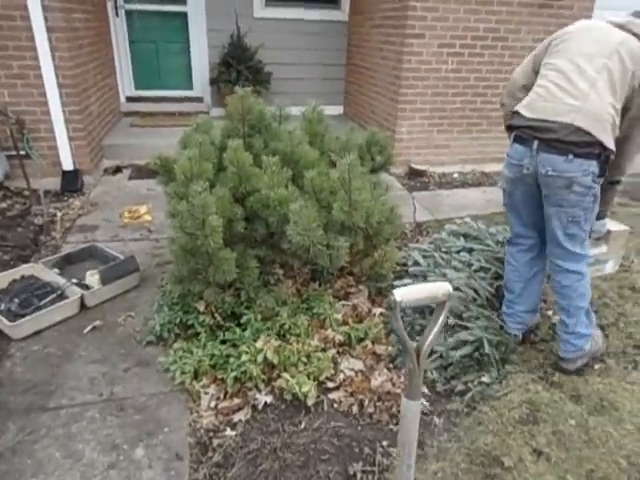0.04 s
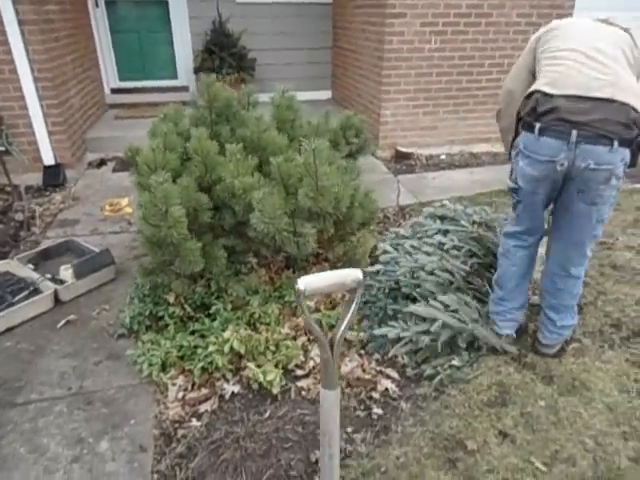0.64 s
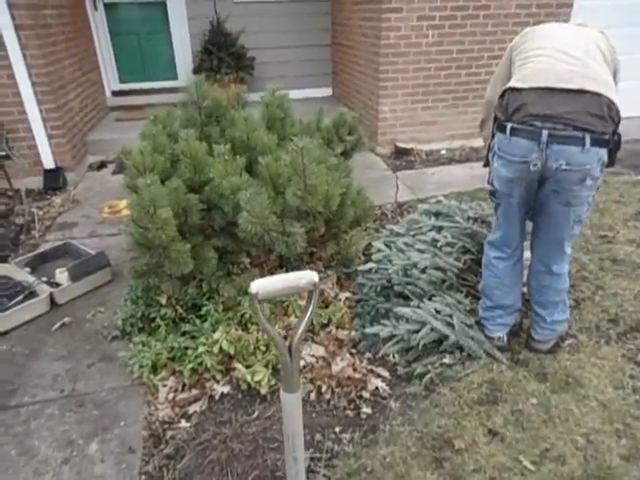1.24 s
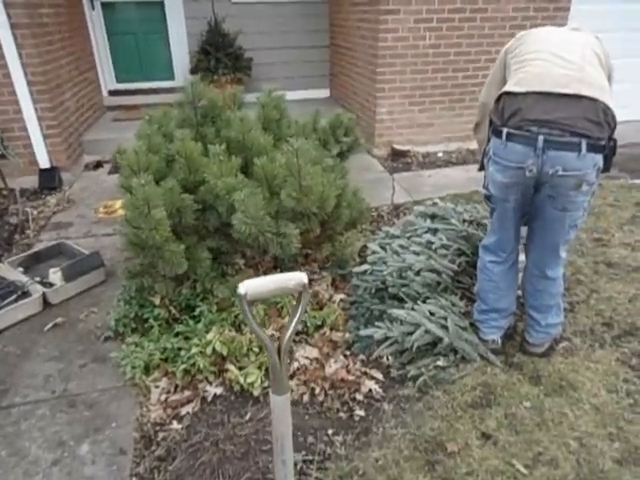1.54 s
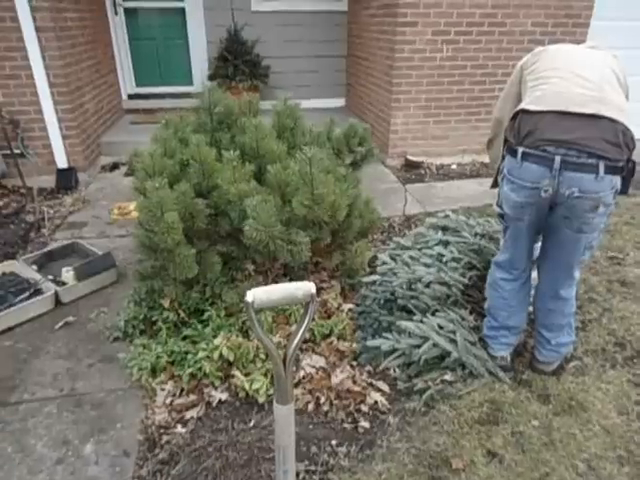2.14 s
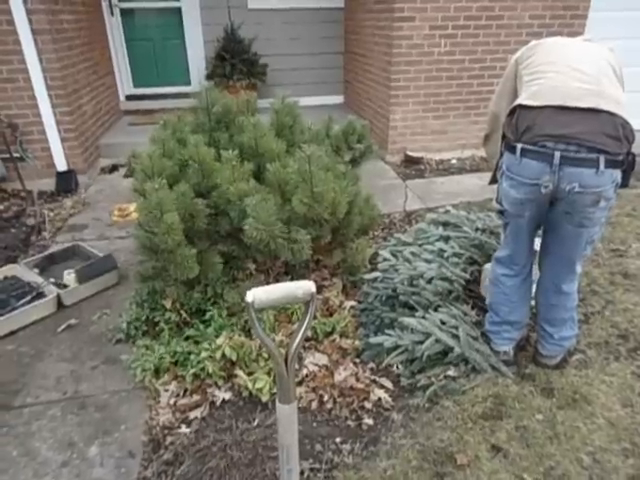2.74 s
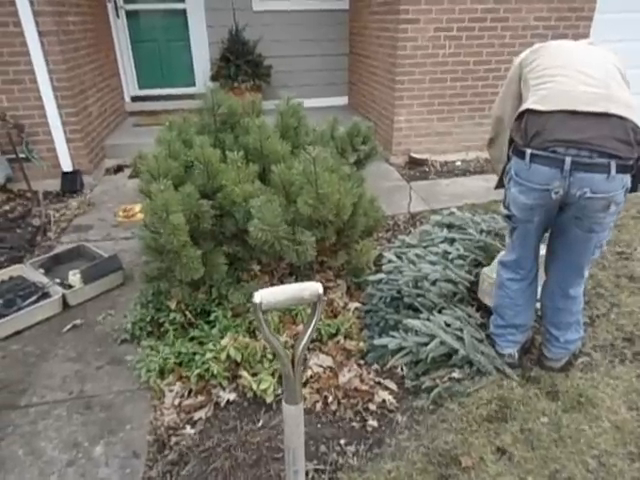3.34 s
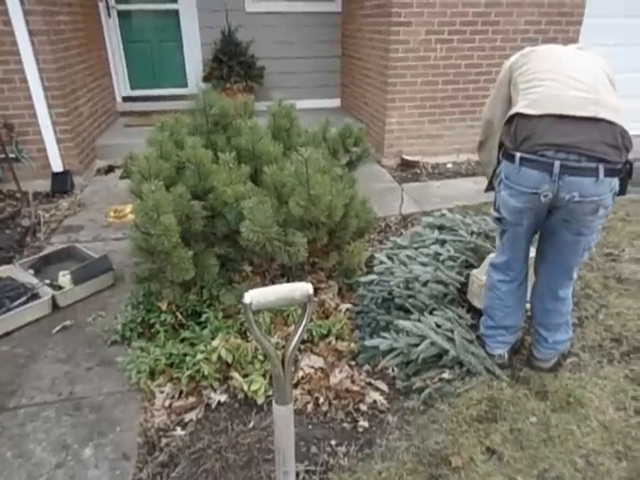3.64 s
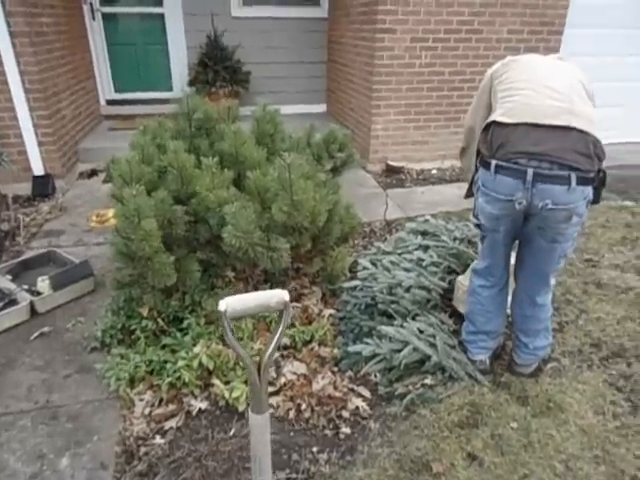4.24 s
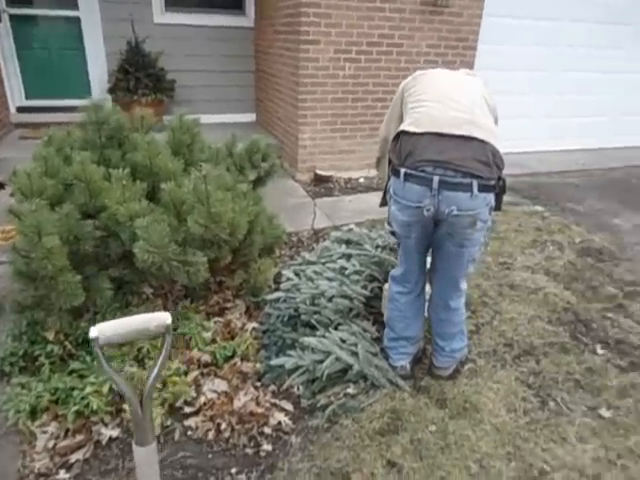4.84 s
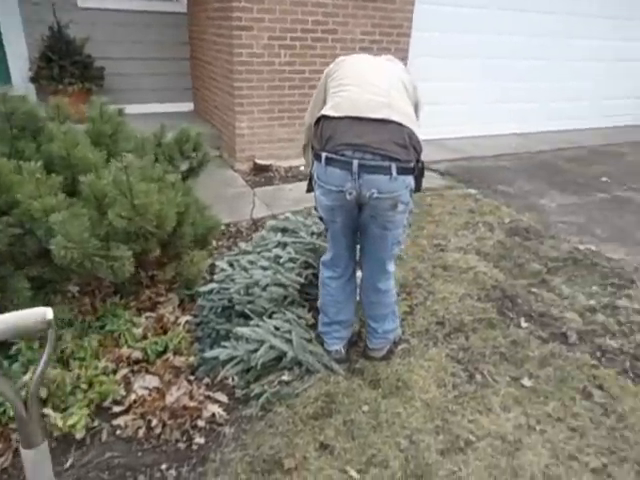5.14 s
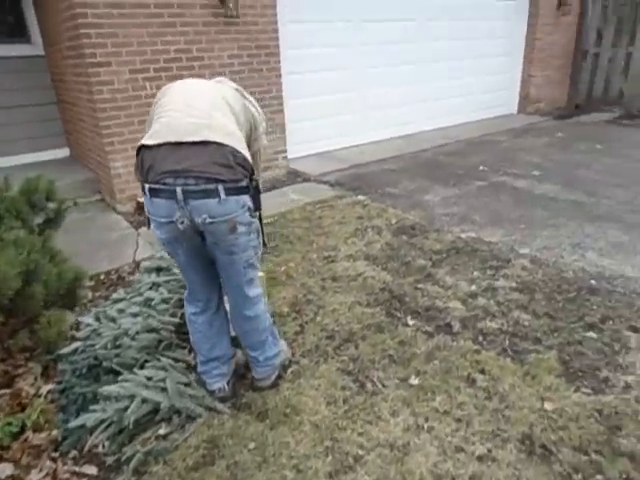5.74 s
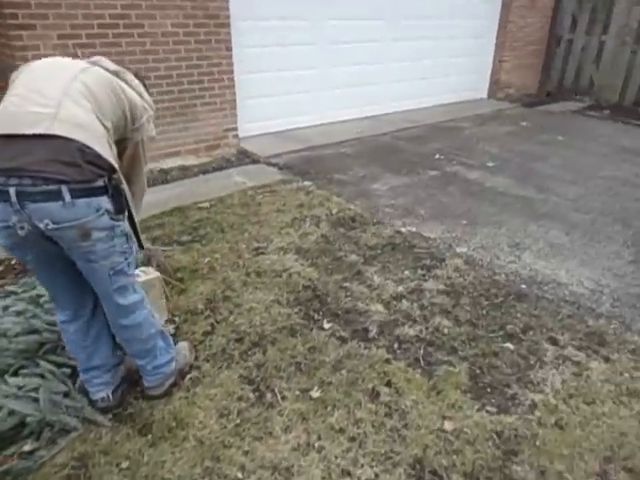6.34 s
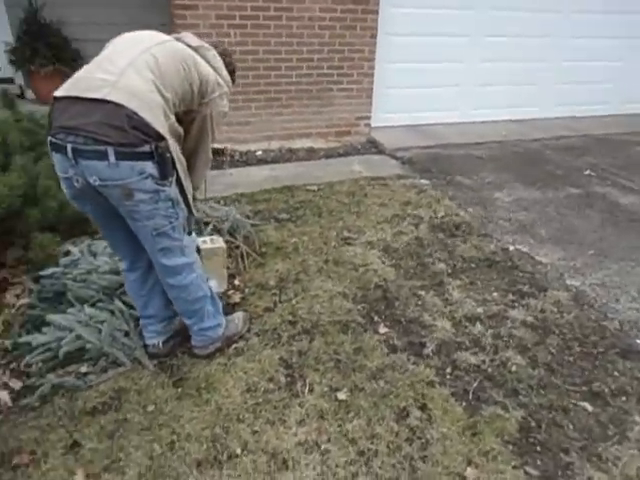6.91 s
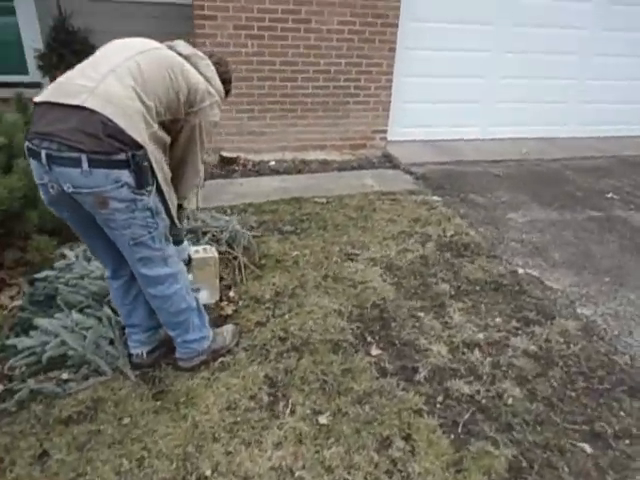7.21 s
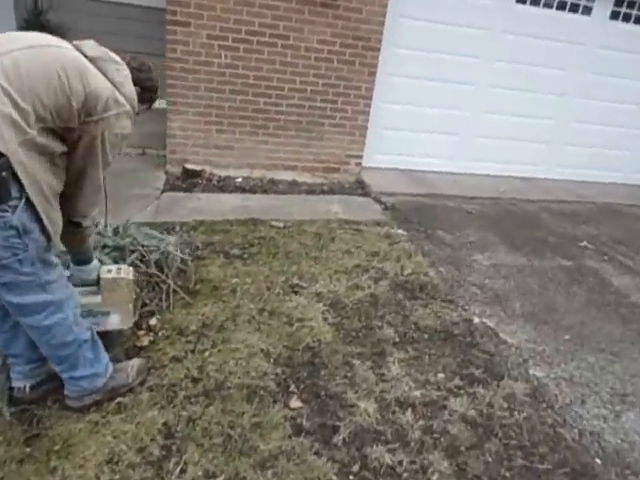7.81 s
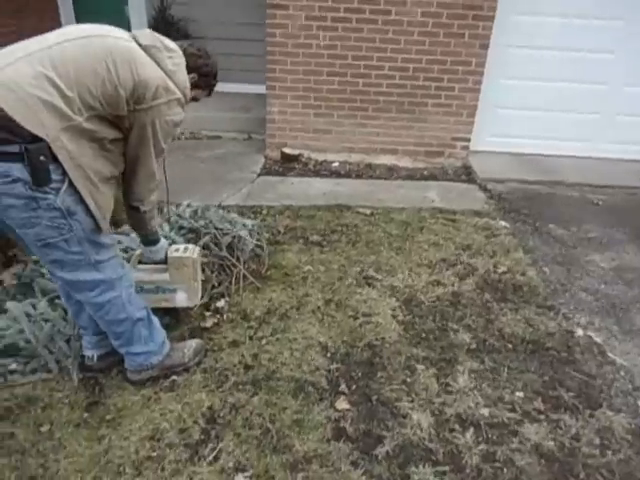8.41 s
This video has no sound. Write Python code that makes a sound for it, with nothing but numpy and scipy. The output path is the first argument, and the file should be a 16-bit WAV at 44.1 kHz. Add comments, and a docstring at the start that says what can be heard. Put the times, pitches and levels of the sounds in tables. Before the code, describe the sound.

A small engine runs steadily outdoors with a clattering throb, interrupted once by a sharp metallic bang.

```python
"""Four-cylinder engine of a small drilling rig, running beside a brick house, picking up with each load.
Exhaust puffs ring the silencer; valve gear clatters over fan rush and gear whine. The microphone moves
from front garden to driveway, where wall reflections make the exhaust boom at twice the firing rate.
Nearby: one hard bang, a faint squeak, a few light scuffs."""
import sys
import numpy as np
from scipy import signal
from scipy.fft import rfft, irfft, next_fast_len
from scipy.io import wavfile

SR = 44100
rng = np.random.default_rng(int(sys.argv[2]) if len(sys.argv) > 2 else 0)


def wav_out(sig):
    """Save sig, one row per channel (or a flat mono array), as 16-bit PCM at SR to the path in sys.argv[1]."""
    wavfile.write(sys.argv[1], SR, np.round(np.clip(np.atleast_2d(sig).T, -1, 1) * 32767).astype(np.int16))


N = 377937
TIME = np.arange(N) / SR
IDLE_FIRING_HZ = 68.57


def undb(db):
    """Decibels to gain."""
    return np.exp(np.asarray(db) * (np.log(10) / 20))


def colour(x, spectrum):
    """Filter by (freq_hz, gain_db) points; output rms 1."""
    hz, db = np.transpose(spectrum)
    size = next_fast_len(N)
    bins_hz = np.arange(size // 2 + 1) * SR / size
    gain = undb(np.interp(np.log(bins_hz + 1), np.log(hz), db))
    shaped = irfft(rfft(x, size) * gain, size)[:N]
    return shaped / np.sqrt(np.mean(shaped ** 2))


def walk(rate_hz):
    """Random drift, spread near 1."""
    steps = rng.standard_normal(1024)
    return np.interp(TIME * rate_hz, np.arange(len(steps)), steps)


def fade(age_s, t60_s):
    """Exponential decay from age 0."""
    return (age_s >= 0) * np.exp(-np.log(1000) * np.abs(age_s) / t60_s)


def governor(ramp_s=.18):
    """Firing rate above idle, Hz: ramps up and down with each load; overlapping loads add."""
    # spells of work: start_s, end_s, rise_hz
    loads = [(-1, .43, .55), (2.25, 9, .45), (2.26, 2.85, 1.1), (3.14, 3.36, 1.2), (3.68, 3.88, 1.15),
             (4.26, 4.57, 1.1), (7.5, 9, .9)]
    return sum(rise_hz * np.clip(np.minimum(TIME - start_s, end_s - TIME) / ramp_s + .5, 0, 1)
               for start_s, end_s, rise_hz in loads)


def on_driveway(mic_m, garden_end_m=.31, driveway_m=.59):
    """0 in the garden, 1 on the driveway."""
    return np.clip((mic_m - garden_end_m) / (driveway_m - garden_end_m), 0, 1)


def standing_wave(order, mic_m):
    """Gain of one exhaust line: direct and reflected sound oppose at nodes, add between."""
    # standing waves between the walls: order, reflection_ratio, node_m, spacing_m
    waves = [(4, .7, 0.49, 1.17), (8, .93, 0.16, 1.64), (12, 0.51, 0.91, 0.81), (16, 0.35, .73, 0.65),
             (20, .6, 1.47, 1.17), (23, 0.3, 1.65, 1.14), (28, 0.39, .7, 1.16)]
    for wave_order, reflection, node_m, spacing_m in waves:
        if round(wave_order) == order:
            return np.abs(1 - reflection * np.exp(2j * np.pi * (mic_m - node_m) / spacing_m))
    return 1


def pipe_phase(orders, db):
    """Minimum phase of a passive pipe with these line levels: hard start, then ring-out."""
    log_gain = np.interp(np.arange(2 * len(orders)), orders, db) * np.log(10) / 20
    mirrored = np.r_[log_gain, log_gain[-2:0:-1]]
    return -signal.hilbert(mirrored).imag[orders]


def exhaust(cycles, rise_hz, mic_m, shade_db, ring_hz=250, width_hz=130, shade_hz=420,
            load_db=9, load_knee_hz=.65, bass_hz=160):
    """Four unequal puffs a cycle ring the silencer, deeper under load; lines vary with mic position."""
    # exhaust harmonics of the four-stroke cycle: order, garden_db, driveway_db
    lines = [(4, -32, -34.5), (5, -32.5, -36.5), (6, -33, -38), (7, -54.5, -45.5), (8, -19.5, -21.6),
             (9, -48, -36), (10, -35, -49), (11, -28, -35.5), (12, -18, -22.8), (13, -35.5, -34),
             (14, -46, -54.5), (15, -28, -39), (16, -19, -23), (17, -34, -32), (18, -44, -46),
             (19, -25, -40.5), (20, -38.5, -32.5), (21, -34.5, -51), (22, -49, -48.5), (23, -33.5, -33.5),
             (24, -40, -49), (25, -44.5, -40), (26, -48, -55), (27, -37, -42), (28, -32.3, -34),
             (29, -54, -56.5), (30, -64.5, -45), (31, -39, -41.5), (32, -39, -42), (33, -55, -58.5),
             (34, -52.5, -61), (35, -55, -59), (36, -47.5, -42.5)]
    orders, garden_db, driveway_db = np.transpose(lines)
    orders = np.rint(orders).astype(int)
    garden_rad, driveway_rad = pipe_phase(orders, garden_db), pipe_phase(orders, driveway_db)
    driveway = on_driveway(mic_m)
    load = np.tanh(rise_hz / load_knee_hz)
    out = np.zeros(N)
    for i, order in enumerate(orders):
        hz = order * cycles[-1] / TIME[-1]
        # a resonance smears each puff in the garden
        smear_rad = -2 * np.arctan(hz * width_hz / (ring_hz ** 2 - hz ** 2))
        phase_rad = (1 - driveway) * (garden_rad[i] + smear_rad) + driveway * driveway_rad[i]
        db = (1 - driveway) * garden_db[i] + driveway * driveway_db[i]
        db += shade_db * min(hz / shade_hz, 1) ** 2  # long waves bend round obstacles
        if order % 4 == 0:  # firing harmonics
            bass = 1 / (1 + (hz / bass_hz) ** 8)
            db += load_db * bass * load + .74 * walk(7)
        else:  # lines from cylinder imbalance
            db += walk(7) - .1
        out += undb(db) * standing_wave(order, mic_m) * np.cos(2 * np.pi * order * cycles + phase_rad)
    return np.sqrt(2) * out * undb(.23 * walk(IDLE_FIRING_HZ))  # puff-to-puff scatter


def throb(cycles, firing_db, lump_db=0):
    """Gain ripple at the firing rate, plus a once-a-cycle lump from the strongest cylinder."""
    angle_rad = 2 * np.pi * (cycles - .13)
    return undb(lump_db * np.cos(angle_rad) + firing_db * np.cos(4 * angle_rad))


def clatter(cycles, parts=24, scatter_db=3, slack_s=.00004, ring_t60_s=.028, wall_db=-19, wall_t60_s=.31):
    """Valves and injectors strike at set crank angles; each rings the block its own way."""
    # spectrum of block and covers: freq_hz, gain_db
    block = [(350, -7.5), (620, 2), (770, 4.5), (840, 1), (1130, 1), (1400, 0), (2000, -5.5), (2550, -4.5),
             (2830, -5.5), (3350, -12), (3750, -6.5), (4500, -17.5), (5030, -14.5), (5500, -33.5)]
    whole_cycles = np.arange(int(cycles[-1]) + 1)
    age_s = TIME[:SR // 8]
    decay = fade(age_s, ring_t60_s) + undb(wall_db) * fade(age_s, wall_t60_s)
    out = np.zeros(N)
    for part in range(parts):
        offset_cycles = (part + rng.uniform(-.32, .3)) / parts
        lateness, force = rng.standard_normal((len(whole_cycles), 2)).T
        hit_s = np.interp(whole_cycles + offset_cycles, cycles, TIME, right=-1) + slack_s * lateness
        inside = (hit_s > 0) & (hit_s < TIME[-1])
        hits = np.zeros(N)
        hits[(hit_s[inside] * SR).astype(int)] = undb(scatter_db * force[inside])
        ring = rng.standard_normal(len(age_s)) * decay
        looseness = undb(walk(2))  # parts take turns rattling hardest
        out += signal.oaconvolve(hits * looseness, ring)[:N]
    return colour(out * throb(cycles, firing_db=-.1, lump_db=2.1), block)


def air_rush(cycles, flutter_db=.5):
    """Fan air and exhaust gas, pulsing with the engine."""
    # spectrum of cooling air and low rumble: freq_hz, gain_db
    spectrum = [(20, -9.5), (45, -3), (90, -0.5), (200, 2.5), (330, 4.5), (520, -2), (800, -12.5),
                (1500, -10.5), (2900, -12.5), (3500, -18.5), (5000, -25.5), (5500, -35.5), (6000, -31),
                (6600, -57)]
    rush = rng.standard_normal(N) * throb(cycles, firing_db=.5)
    return colour(rush * undb(flutter_db * walk(6.6)), spectrum)


def whine(cycles, wander_rad=.84, waver_db=2):
    """Wavering gear and hydraulic pump tones, tied to the crankshaft."""
    # tones at multiples of the cycle rate: order, relative_db
    tones = [(44, -49.5), (45, -49.5), (52, -44), (56, -52), (65, -50), (69, -46.5), (163, -49.5)]
    out = np.zeros(N)
    for order, db in tones:
        amplitude = np.sqrt(2) * undb(db + waver_db * walk(9))
        out += amplitude * np.cos(2 * np.pi * order * cycles + wander_rad * walk(18))
    return out


def bang(ring_db=-6.5, crack_db=2, crack_t60_s=.054, slap_db=-11, slap_t60_s=.32):
    """Hard blow with quick rebounds: ringing modes, a crack, a short slap off the house fronts."""
    # blow and rebounds: start_s, level_db
    blows = [(1.9838, -3), (1.9877, -14), (1.997, -4.5), (2.004, -7.5), (2.017, -13.5)]
    # modes of the struck object: pitch_hz, level_db, t60_s
    modes = [(340, -3.5, 0.071), (435.4, 1, 0.15), (619, 5, 0.3), (662, 3.5, 0.23), (920, -15.5, 0.16),
             (952, 5.5, 0.26), (1048, -1, 0.086), (1232, -3.5, 0.16), (1313, -1, 0.17), (1710, -12.5, 0.22),
             (2495, -19, .2), (2580, -8, 0.07), (2800, -14.5, 0.073), (3850, -9, 0.15), (4550, -15.5, .15)]
    # crack spectrum: freq_hz, gain_db
    spectrum = [(60, -30), (200, 5), (600, -2.5), (1200, -8), (2200, -8.5), (2800, -5.5), (3500, -10.5),
                (5000, -16), (5600, -34), (6100, -36), (7000, -52.5)]
    age_s = TIME[:SR // 2]
    ring = sum(undb(db) * fade(age_s, t60_s) * np.sin(2 * np.pi * hz * age_s) for hz, db, t60_s in modes)
    hits, crack_power = np.zeros(N), np.zeros(N)
    for start_s, db in blows:
        hits[int(start_s * SR)] += undb(db)
        decay = fade(TIME - start_s, crack_t60_s) + undb(slap_db) * fade(TIME - start_s, slap_t60_s)
        crack_power += (undb(db) * decay) ** 2
    crack = colour(rng.standard_normal(N), spectrum) * np.sqrt(crack_power)
    return undb(ring_db) * signal.oaconvolve(hits, ring)[:N] + undb(crack_db) * crack


def squeak(peak_s=2.2, half_width_s=.06, pitch_hz=3310, level_db=-40.5):
    """Brief unsteady whistle just after the bang."""
    envelope = np.exp(-((TIME - peak_s) / half_width_s) ** 2)
    return np.sqrt(2) * undb(level_db) * envelope * np.sin(2 * np.pi * pitch_hz * TIME + walk(60))


def scuffs(grain_db=2):
    """Short gritty brushes and taps against the ground."""
    # ground contacts: peak_s, rise_s, fall_s, level_db, tilt_db_per_octave
    contacts = [(2.91, .028, .045, -18.8, .3), (3.937, .004, .009, -22, 4), (3.982, .002, .01, -15.6, 1),
                (4.002, .01, .03, -20.8, -3)]
    # grit spectrum: freq_hz, gain_db
    spectrum = [(300, -14.5), (650, 6), (1100, 3.5), (1600, 0.5), (3000, -5), (3900, -13.5), (4500, -22),
                (5500, -40)]
    out = np.zeros(N)
    for peak_s, rise_s, fall_s, level_db, tilt_db_per_octave in contacts:
        grit = rng.standard_normal(N) * undb(grain_db * walk(110))
        tilted = [(hz, db + tilt_db_per_octave * np.log2(hz)) for hz, db in spectrum]
        envelope = np.exp(-np.maximum((peak_s - TIME) / rise_s, (TIME - peak_s) / fall_s))
        out += undb(level_db) * envelope * colour(grit, tilted)
    return out


def gain_control(x, limit_db=-9, slope=.78, attack_s=.023, recover_db_per_s=.48):
    """Fast gain cut above the limit, slow recovery."""
    step = 1 / (attack_s * SR)
    power = signal.lfilter([step], [1, step - 1], np.clip(x, -1, 1) ** 2)
    cut_db = slope * np.maximum(10 * np.log10(power + 1e-12) - limit_db, 0)
    recovered_db = recover_db_per_s * TIME
    return x * undb(recovered_db - np.maximum.accumulate(cut_db + recovered_db, axis=-1))


def scene(machine_db=-29.5, driveway_change_db=-3, shade_share=.45):
    """Engine, bang, squeak and scuffs at one moving microphone."""
    # mic path, garden to driveway, with short-wave shading: time_s, position_m, shade_db
    path = [(0, 0.024, 2), (.4, 0.055, 0), (1.1, 0.15, -0.3), (1.9, 0.21, 1.5), (5.1, .21, 1),
            (5.65, 0.36, -0.4), (6.05, 0.56, -1.5), (6.35, 0.68, -1.5), (6.9, 1.05, -1.3), (7.4, 1.37, 0.5),
            (7.9, 1.475, -0.4), (8.57, 1.54, -0.5)]
    path_s, *columns = np.transpose(path)
    mic_m, shade_db = [np.interp(TIME, path_s, column) for column in columns]
    rise_hz = governor()
    cycles = np.cumsum(IDLE_FIRING_HZ + rise_hz) / (4 * SR) - .63  # four firings a cycle
    machine = undb(-2) * clatter(cycles) + undb(3) * air_rush(cycles) + undb(31) * whine(cycles)
    machine *= undb(machine_db + driveway_change_db * on_driveway(mic_m) + shade_share * shade_db)
    engine = exhaust(cycles, rise_hz, mic_m, shade_db) + machine
    return (engine + bang() + scuffs() + squeak())[None]


def record(dry, mic_hz=6400, top_hz=15400):
    """Narrow-band microphone: overloads on the bang, gain reduced after it."""
    mic_lowpass = signal.cheby1(10, .2, mic_hz, fs=SR, output="sos")
    top_lowpass = signal.ellip(8, .1, 70, top_hz, fs=SR, output="sos")
    narrow = signal.sosfilt(mic_lowpass, np.clip(gain_control(dry), -.83, .83))
    return signal.sosfilt(top_lowpass, np.clip(narrow, -.98, .98))


dry = scene()
out = record(dry)
wav_out(out)
```